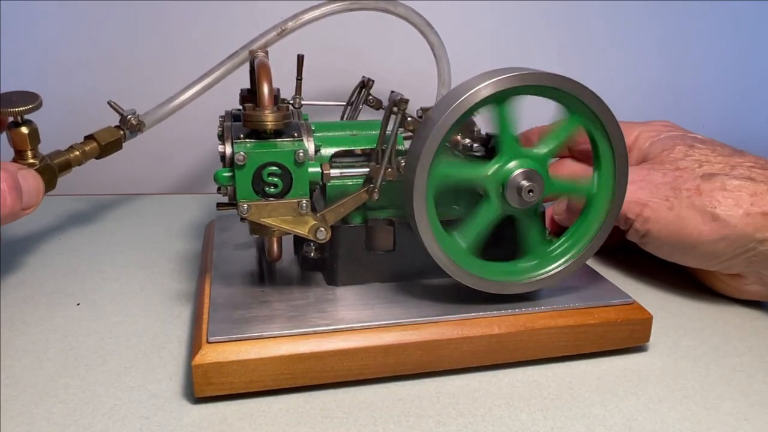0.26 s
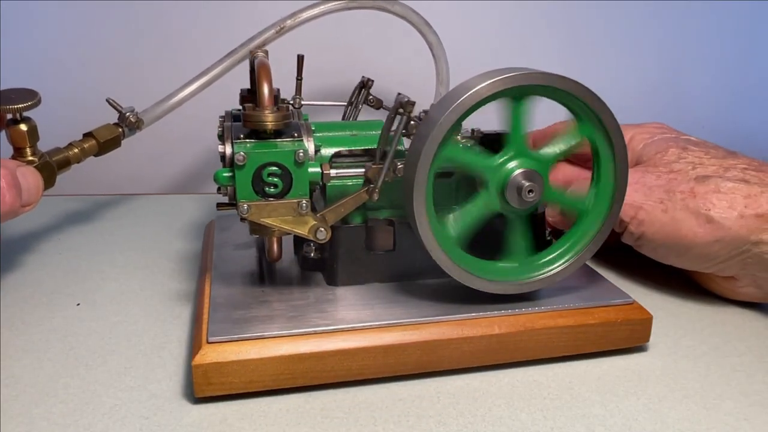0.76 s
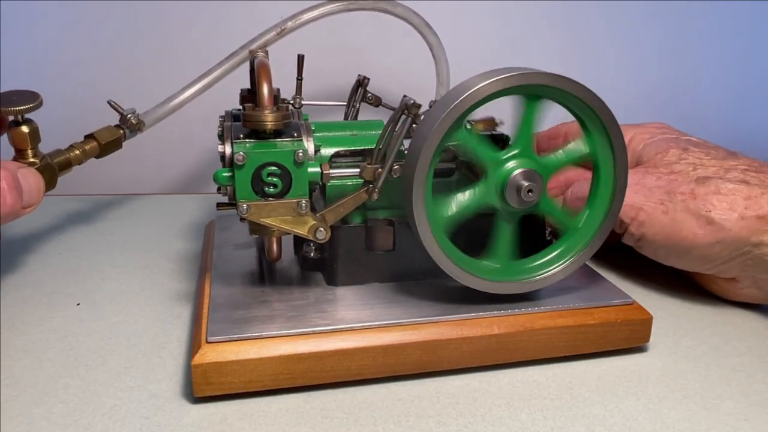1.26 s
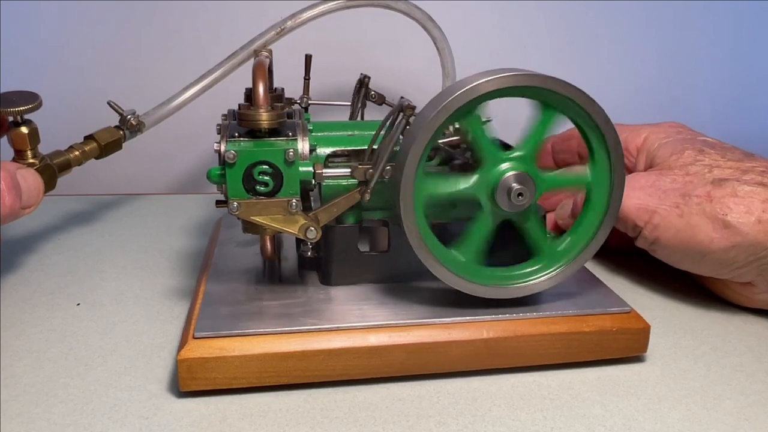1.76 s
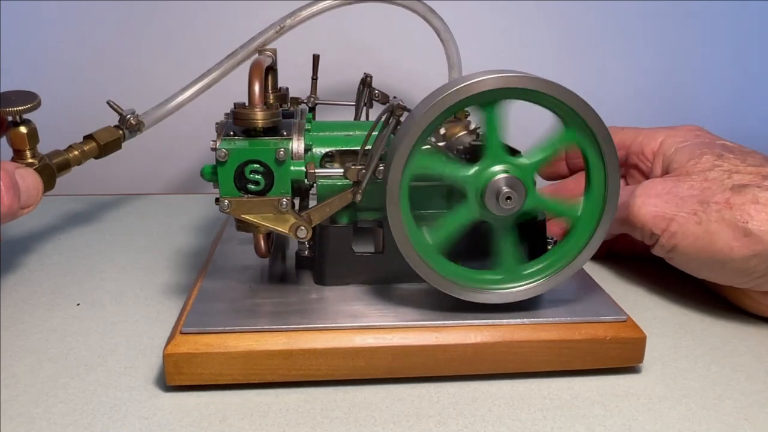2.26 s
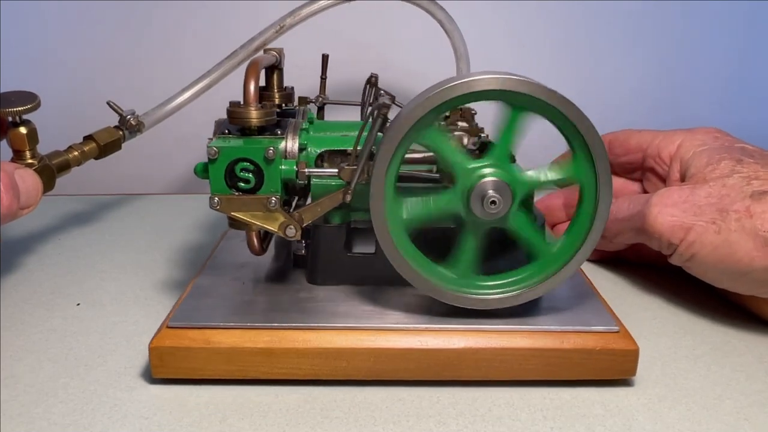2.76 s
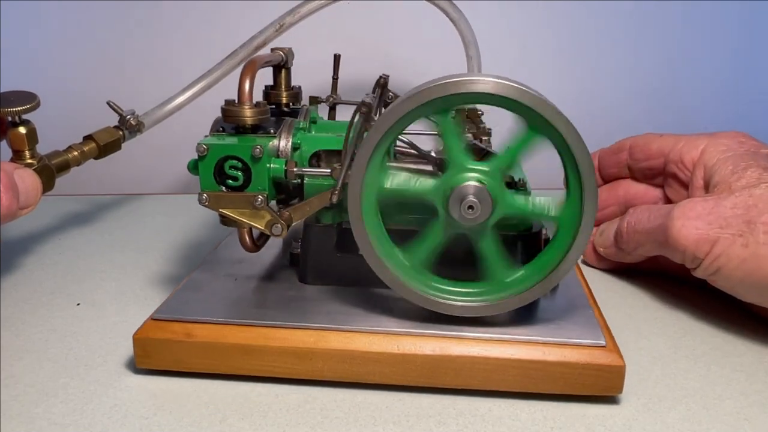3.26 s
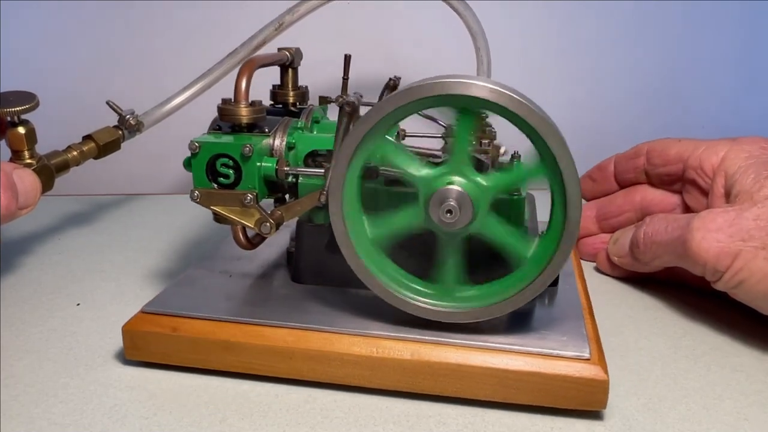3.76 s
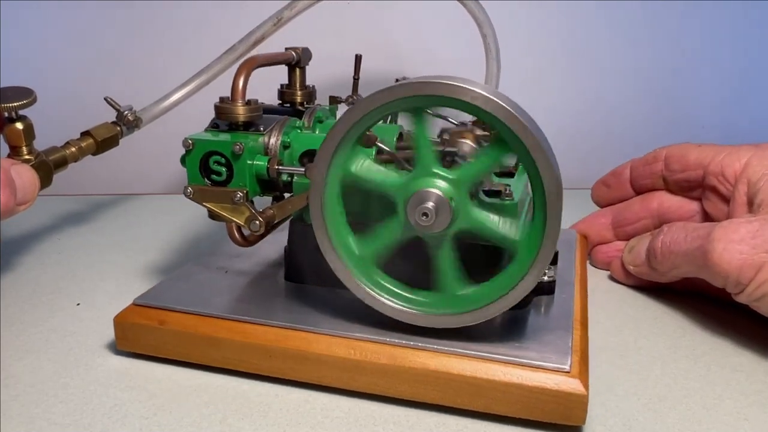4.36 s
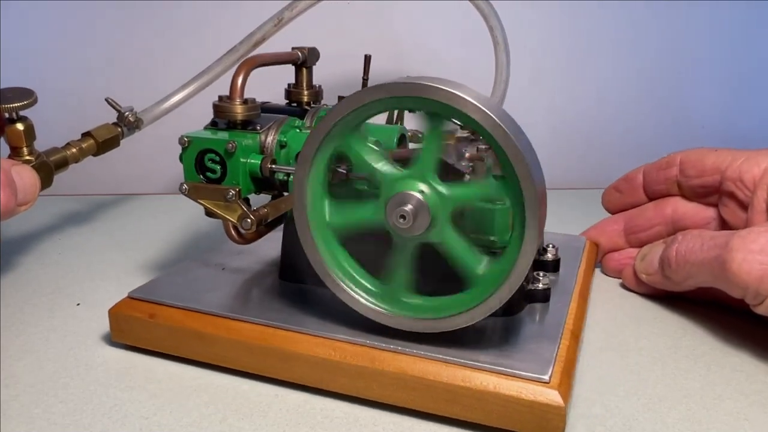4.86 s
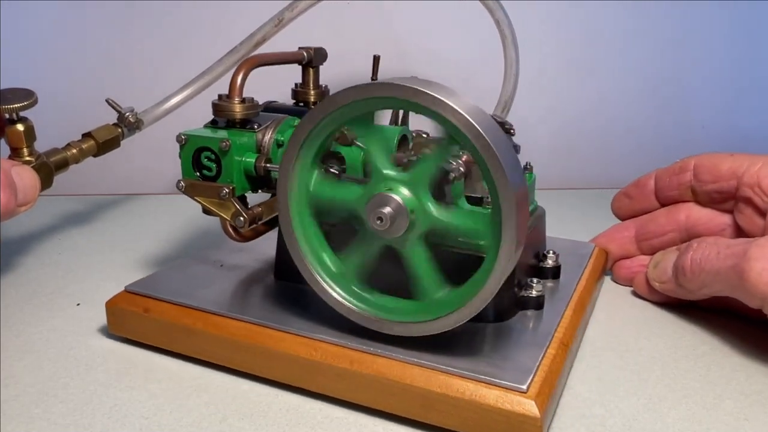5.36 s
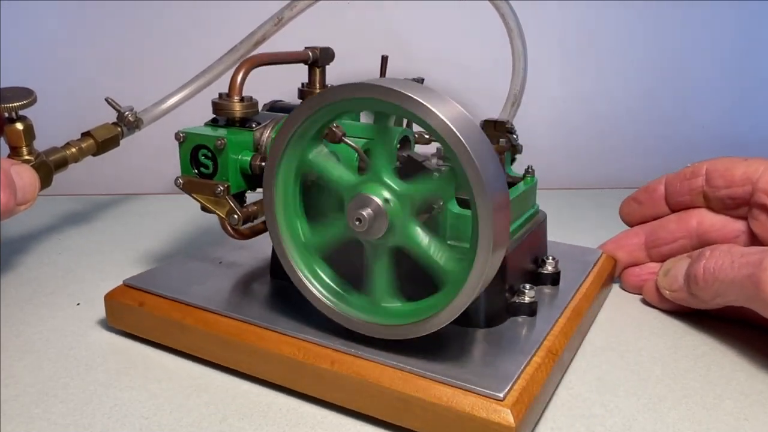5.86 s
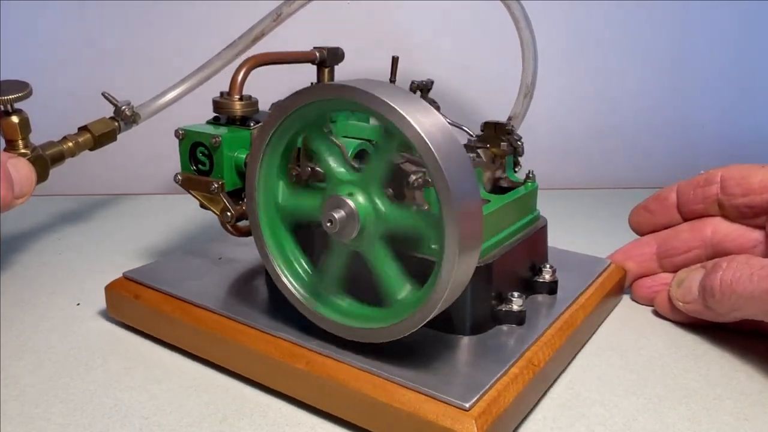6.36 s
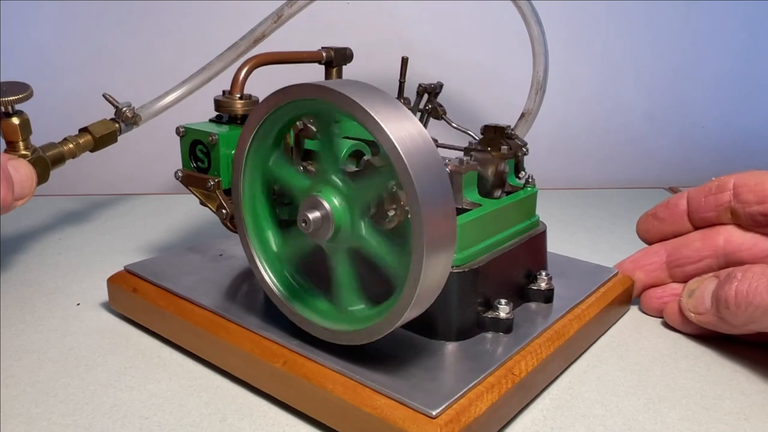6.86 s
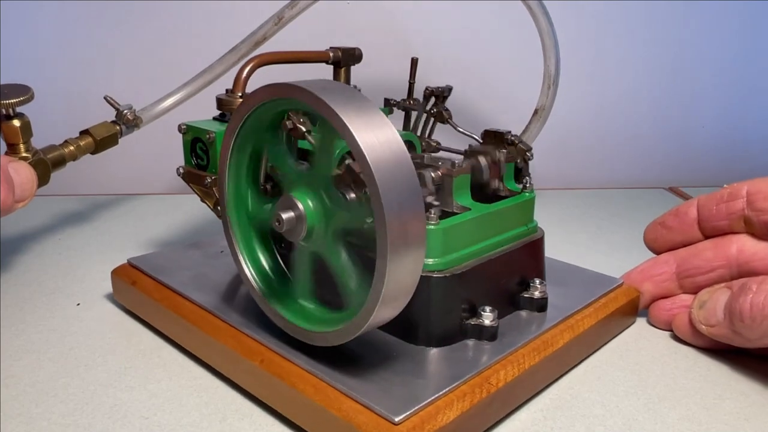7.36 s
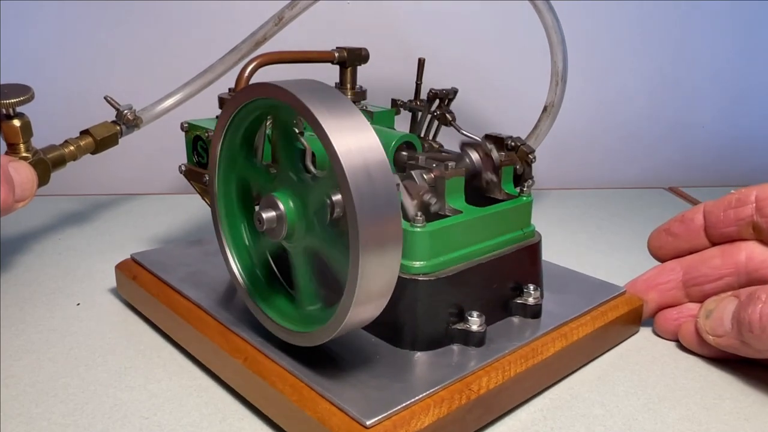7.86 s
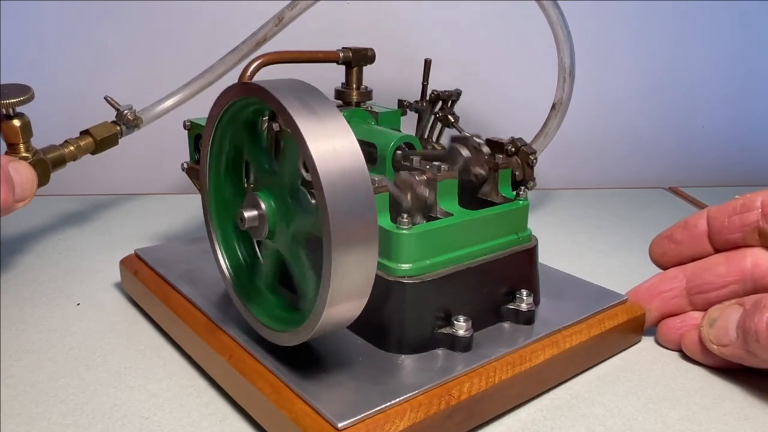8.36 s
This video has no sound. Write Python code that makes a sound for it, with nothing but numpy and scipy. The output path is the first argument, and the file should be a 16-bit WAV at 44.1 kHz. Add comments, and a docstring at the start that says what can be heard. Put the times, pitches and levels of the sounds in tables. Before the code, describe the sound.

A small compressed-air model engine runs steadily with quick, even metallic knocking, pulsing exhaust puffs and a constant hiss of air.

```python
"""On a table in a quiet room, a small compressed-air model engine runs and is slowly turned round.
Each crank turn knocks the rods at both dead centres, ringing the frame, and flicks the valve gear.
The exhaust puffs, air whistles through the cylinder ports and a high fizz pulses, all with the crank.
The supply valve leaks steadily, and the wooden base thumps the table over a low hum and rumble."""
import sys
import numpy as np
from scipy import signal
from scipy.fft import rfft, irfft, next_fast_len
from scipy.io import wavfile
from scipy.ndimage import uniform_filter1d, map_coordinates

SR = 44100
rng = np.random.default_rng(int(sys.argv[2]) if len(sys.argv) > 2 else 0)


def to_wav(sig):
    """Store sig (one row per channel, or 1-D mono) as 16-bit WAV at the path in sys.argv[1].

    Samples outside -1..1 are clipped; the rate is SR.
    """
    pcm = np.clip(np.atleast_2d(sig), -1, 1) * 32767
    pcm = np.round(pcm).astype(np.int16)
    wavfile.write(sys.argv[1], SR, pcm.T)  # frames by channels


N = 380141


def amp(db):
    """Gain of a level in dB."""
    return 10 ** (np.asarray(db) / 20)


def unit(x):
    """Scaled to rms 1."""
    return x / np.sqrt(np.mean(x ** 2) + 1e-20)


def along(points, hz):
    """(freq_hz, value) rows interpolated on a log axis."""
    freq_hz, value = np.transpose(points)
    return np.interp(np.log(hz + 1), np.log(freq_hz + 1), value)


def by_time(rows):
    """Gain per sample from (time_s, level_db) rows."""
    return amp(np.interp(np.arange(N) / SR, *np.transpose(rows)))


def drift(front_db, turned_db):
    """Gain per sample, moving evenly in dB as the base is turned."""
    return amp(np.linspace(front_db, turned_db, N))


def wobble(rate_hz):
    """Smooth random curve, rate_hz knots a second."""
    knots = rng.standard_normal(int(N * rate_hz / SR) + 4)
    return map_coordinates(knots, [np.arange(N) * rate_hz / SR])


def filtered(x, response):
    """x through a complex frequency response."""
    size = next_fast_len(N + 8192)
    return irfft(rfft(x, size) * response(np.fft.rfftfreq(size, 1 / SR)), size)[..., :N]


def peaks(modes):
    """Steep-sided response of a set of resonances."""
    return lambda hz: np.sqrt(sum((amp(db) / (1 + (2 * (hz - centre_hz) / width_hz) ** 2)) ** 2
                                  for centre_hz, width_hz, db in modes))


# Phase between channels: freq_hz, left_lead_rad
STEREO_PHASE = [(0, 0), (300, 0), (800, 1.6), (1200, .2), (2240, .2), (3450, 1.9), (3960, .8), (5500, -1),
                (7000, -3.3), (8000, -3.8), (9000, -4.6), (10300, -6.2), (11700, -6.3), (13000, -7.6),
                (14000, -9.3), (15000, -9.5), (15800, -10.6)]
# Likeness of channels: freq_hz, coherence_ratio
COHERENCE = [(40, .975), (130, .975), (220, .94), (300, .6), (800, .85), (2500, .6), (5000, .6),
             (7300, .95), (11000, .92), (15000, .7)]

def stereo(same, other, pan_db, aside=True):
    """Partly coherent pair, phase-shifted for sound from aside; positive pan_db is left."""
    def mix_rad(hz):
        return np.arccos(np.clip(along(COHERENCE, hz), 0, 1)) / 2

    def shift(hz):
        lead_rad = aside * np.interp(hz, *np.transpose(STEREO_PHASE))
        return np.exp(.5j * np.outer([1, -1], lead_rad))
    shared = filtered(same, lambda hz: np.cos(mix_rad(hz)) * shift(hz))
    apart = filtered(other, lambda hz: np.sin(mix_rad(hz)) * shift(hz) * [[1j], [-1j]])
    return (shared + apart) * amp([[pan_db / 2], [-pan_db / 2]])


def air(colour, pan_db, patchy_db, aside=True):
    """Coloured stereo noise, rms 1, with random gain patches in time and frequency."""
    spectra = signal.stft(rng.standard_normal((2, N)), nperseg=256)[2]
    patches = uniform_filter1d(rng.standard_normal(spectra.shape[1:]), size=3, axis=0)
    patches = uniform_filter1d(patches, size=6, axis=1)
    pair = signal.istft(spectra * amp(patchy_db * unit(patches)), nperseg=256)[1][:, :N]
    return unit(stereo(*filtered(pair, colour), pan_db, aside))


def ringing(hz, t60_s, rise_cycles):
    """One decaying sine per mode, with a soft onset."""
    t = np.arange(SR // 6) / SR
    hz, t60_s = np.reshape(hz, (-1, 1)), np.reshape(t60_s, (-1, 1))
    return amp(-60 * t / t60_s) * np.sin(2 * np.pi * hz * t) * (1 - np.exp(-t * hz / rise_cycles))


# Crank speed: time_s, speed_rpm
CRANK_SPEED = [(0, 254.46), (1.7, 254.52), (2.6, 252.08), (3.8, 251.92), (4.9, 253.03), (6.2, 251.43),
               (7.5, 251.25), (7.65, 246.11), (8.62, 250.04)]

def crank_starts(start_turns=.1127):
    """Times in s at which the crank passes the outer dead centre."""
    t = np.arange(-SR // 4, N + SR // 2) / SR
    turns = np.cumsum(np.interp(t, *np.transpose(CRANK_SPEED))) / (60 * SR)
    turns = turns - np.interp(0, t, turns) + start_turns
    count = int(np.interp(N / SR, t, turns)) + 2
    return np.interp(np.arange(count), turns, t)


def by_crank(rows):
    """Gain per sample from (angle_turns, level_db) rows, repeated every turn."""
    starts_s = crank_starts()
    angle_turns = np.interp(np.arange(N) / SR, starts_s, np.arange(len(starts_s))) % 1
    return amp(np.interp(angle_turns, *np.transpose(rows)))


def struck(angle_turns, db, sound, jitter_s):
    """Plays the pair sound(turned) once a crank turn; turned runs 0-1 as the base goes round."""
    out, starts_s = np.zeros((2, N + 2 * SR)), crank_starts()
    for start_s, end_s in zip(starts_s, starts_s[1:]):
        hit_s = start_s + angle_turns * (end_s - start_s) + jitter_s * rng.standard_normal()
        at = SR // 2 + round(hit_s * SR)
        blow = amp(db) * sound(start_s * SR / N)
        out[:, at:at + blow.shape[1]] += blow
    return out[:, SR // 2:][:, :N]


# Room decay: freq_hz, t60_s
ROOM_DECAY = [(150, 0.25), (1000, 0.17), (8000, 0.057)]

def reverb(x):
    """Short room tail; the treble dies first."""
    hz, t, spectra = signal.stft(rng.standard_normal((2, SR // 2)), SR, nperseg=256)
    decay = amp(-60 * t / along(ROOM_DECAY, hz)[:, None])
    tail = signal.istft(spectra * decay, SR, nperseg=256)[1]
    delayed = np.pad(x, (200, 0))[None]
    return signal.fftconvolve(delayed, tail / np.linalg.norm(tail[0]), axes=1)[:, :N]


# Rumble spectrum: freq_hz, density_db
RUMBLE_SPECTRUM = [(20, -46), (35, -19), (50, -3), (65, -5.5), (90, -8.5), (125, -8), (230, -25.5),
                   (262, -10.5), (290, -27.5), (420, -27), (700, -120)]

def rumble():
    """Steady low noise of the room."""
    return amp(-51.5) * air(lambda hz: amp(along(RUMBLE_SPECTRUM, hz)), pan_db=.6, patchy_db=1.1)


# Hum swells: time_s, level_db
HUM_SWELLS = [(0, -61), (2, -57), (3.6, -47), (4.7, -57.5), (5.4, -47), (6.1, -52.5), (6.9, -50),
              (7.7, -53), (8.62, -68)]

def hum(pitch_hz=75, waver_hz=3.5):
    """Low hum, wavering in pitch and strength."""
    hz = pitch_hz + waver_hz * np.array([wobble(14), wobble(14)])
    phase = 2 * np.pi * np.cumsum(hz, axis=1) / SR
    tone = amp(2.5 * wobble(10)) * np.sin(phase)
    return by_time(HUM_SWELLS) * unit(stereo(*tone, pan_db=.6))


# Hiss spectrum: freq_hz, density_db
HISS_SPECTRUM = [(200, -1.5), (300, -2), (600, -4), (1000, -7), (1500, -4), (2000, -10), (2600, -6),
                 (3050, -9), (3900, -6.5), (5500, -8.5), (8500, -12), (9800, -44), (12000, -10.5),
                 (14000, -3.5), (15000, -13.5), (15800, -6.5)]

def broad_hiss(low_cut_hz=150):
    """Wideband hiss of leak and room."""
    hiss = air(lambda hz: amp(along(HISS_SPECTRUM, hz)) * (hz > low_cut_hz), pan_db=.4, patchy_db=3.5)
    return amp(-44) * hiss


# Leak resonances: centre_hz, width_hz, level_db
LEAK_BANDS = [(6800, 1220, -2), (7170, 510, 4.5), (7670, 440, 0.5), (8230, 500, -5), (9070, 1220, -6.5)]

def leak():
    """Air escapes steadily at the supply valve."""
    return drift(-42.5, -42) * air(peaks(LEAK_BANDS), pan_db=0, patchy_db=2.5)


# Table top modes: pitch_hz, level_db, t60_s
TABLE_MODES = [(109, -7, 0.11), (127.5, -2, 0.14), (153.5, 4.5, 0.1), (176.4, 7, 0.078), (190.6, -5, 0.082),
               (226.4, -0.5, 0.088), (249.6, -11, 0.18)]

def table_top(blows, tilt_db_per_oct, settle_s=2.2):
    """Blows of the base ring the table, rms 1; sharper blows tilt toward the high modes."""
    hz, mode_db, t60_s = np.transpose(TABLE_MODES)
    ring = ringing(hz, t60_s, rise_cycles=1.2) * amp(tilt_db_per_oct * np.log2(hz / hz[0]))[:, None]
    out = 0
    for angle_turns, first_db, settled_db in blows:
        def thump(turned):
            change_db = (settled_db - first_db) * np.clip(turned * N / SR / settle_s, 0, 1)
            scatter_db = rng.normal(0, .8, (2, len(hz)))
            return amp(change_db + mode_db + scatter_db) @ ring
        out = out + struck(angle_turns, first_db, thump, jitter_s=.001)
    return unit(stereo(*out, pan_db=.5))


# Rocking pushes: angle_turns, first_db, settled_db
BASE_PUSHES = [(.135, 9, 5), (.21, 5, -1.5), (.435, -4, 5), (.58, -1, -8.5), (.795, -35, -0.5)]

def rocking():
    """The base rocks against the table with dull thumps."""
    return drift(-50.5, -52) * table_top(BASE_PUSHES, tilt_db_per_oct=-10.5)


# Rod reversals: angle_turns, first_db, settled_db
ROD_JOLTS = [(.03, -3, 4.5), (.515, 1.5, 3.5)]
# Fade of the jolts: time_s, level_db
JOLT_FADE = [(0, -43.5), (1, -46), (2, -56), (3, -59), (8.62, -62)]
# Low-mid rustle: centre_hz, width_hz, level_db
RUSTLE_BAND = [(417, 1500, 0)]

def jolts():
    """The reversing rod jolts the table; jolts and a rustle fade as the base is turned."""
    thumps = table_top(ROD_JOLTS, tilt_db_per_oct=13)
    rustle = amp(-8.5) * air(peaks(RUSTLE_BAND), pan_db=-1, patchy_db=1)
    return by_time(JOLT_FADE) * (thumps + rustle)


# Fizz bands: centre_hz, width_hz, level_db
FIZZ_BANDS = [(13150, 540, -1), (14600, 1300, -8), (15300, 600, -3)]
# Level of the top-treble fizz: time_s, level_db
FIZZ_ENVELOPE = [(0, -72), (1.4, -68), (2.2, -52), (3.4, -51), (4.8, -52), (5.4, -60), (6.6, -69),
                 (8.62, -69)]

def treble_fizz():
    """A top-treble fizz rises, holds, then falls, pulsing once a turn."""
    fizz = air(peaks(FIZZ_BANDS), pan_db=-2, patchy_db=2.5, aside=False)
    return by_crank(PORT_FLOW) * by_time(FIZZ_ENVELOPE) * fizz


# Port flow over one turn: angle_turns, level_db
PORT_FLOW = [(0, -24), (.06, 7.5), (.12, -4), (.3, -0.5), (.36, -3.5), (.42, 3), (.6, 0.5), (.75, -1.5),
             (.88, -5), (.96, 0.5), (1, -1.5)]
# Air resonances: centre_hz, width_hz, level_db
PASSAGE_BANDS = [(832, 94, 1), (1480, 160, -8), (2535, 720, -9.5), (3484, 324, 1.5), (4590, 830, -5.5),
                 (5040, 120, -2)]
PIPE_BAND = [(6127, 630, 0)]
THROAT_BAND = [(4325, 170, 0)]
# Pipe and throat swells: time_s, level_db
PIPE_SWELLS = [(0, -50.5), (1.8, -53.5), (3, -47.5), (4.2, -54.5), (6, -48), (7, -52), (8.62, -47.5)]
THROAT_SWELLS = [(0, -51), (2.5, -51.5), (4.5, -51), (6.5, -54), (8.62, -50.5)]

def cylinder_ports():
    """Air pulses through the ports: breathy whistles to the left."""
    passages = drift(-47, -46.5) * air(peaks(PASSAGE_BANDS), pan_db=7.5, patchy_db=1.5)
    pipe = by_time(PIPE_SWELLS) * air(peaks(PIPE_BAND), pan_db=7.5, patchy_db=3)
    throat = by_time(THROAT_SWELLS) * air(peaks(THROAT_BAND), pan_db=12.5, patchy_db=0)
    return by_crank(PORT_FLOW) * (passages + pipe + throat)


# Exhaust opening over one turn: angle_turns, level_db
EXHAUST_OPENING = [(0, -2), (.05, -2.5), (.1, -9), (.18, -4.5), (.3, -0.5), (.35, -6.5), (.41, -9),
                   (.45, -10.5), (.49, 1.5), (.6, -6), (.7, -6), (.88, -7.5), (.95, -9), (1, -1)]
# Jet and edge tone resonances: centre_hz, width_hz, level_db
JET_BANDS = [(10580, 600, 11), (11700, 270, -8), (12160, 340, 6)]
EDGE_BAND = [(11220, 870, 0)]
# Edge tone swells: time_s, above_jet_db
EDGE_SWELLS = [(0, -3.5), (1.5, 0.5), (2.3, 6.5), (3.2, 1), (4, -2.5), (5, -4), (6.5, -0.5), (8.62, 1.5)]

def exhaust(flicker_db=.45):
    """A hissing jet and its edge tone puff as the exhaust opens."""
    edge = by_time(EDGE_SWELLS) * air(peaks(EDGE_BAND), pan_db=0, patchy_db=2)
    gain = by_crank(EXHAUST_OPENING) * drift(-43.5, -47) * amp(flicker_db * wobble(40))
    jet = air(peaks(JET_BANDS), pan_db=0, patchy_db=2)
    return gain * (jet + edge)


# Valve gear ticks: angle_turns, level_db
VALVE_TICKS = [(0.057, -35.5), (.41, -41), (.478, -49)]

def valve_gear(pitch_hz=13050, scatter_db=3):
    """A tiny steel link ticks, unevenly from turn to turn."""
    ring = ringing(pitch_hz, t60_s=.016, rise_cycles=.73)

    def tick(_):
        return amp(rng.normal(0, scatter_db)) * ring * [[1], [1]]
    return sum(struck(angle_turns, db, tick, jitter_s=.0008) for angle_turns, db in VALVE_TICKS)


# Frame and bed plate modes: pitch_hz, front_db, turned_db, t60_s
FRAME_MODES = [(445, -16, -9.5, 0.023), (573, -25, -6.5, 0.028), (728, -7, -3.5, 0.035),
               (807.8, 3.5, 1, 0.041), (835.3, 3, 0, 0.053), (1003, -26, -7, 0.049),
               (1146, -7.5, -9, 0.037), (1405, -1.5, -13.5, 0.024), (1980, 0.5, -15, 0.018),
               (2152, -10, -3.5, 0.026), (2532, -20.5, -11, 0.065), (3524, -54, -1, 0.06),
               (4480, -20, -4, 0.04), (4600, -10.5, -18, 0.13), (5740, -25, -1, 0.04),
               (6780, -5.5, 14, 0.011)]
# Rod contacts (knock, rebound, slack take-up, inner knock, light tap):
# angle_turns, front_db, turned_db, cutoff_hz, scrape_db
ROD_CONTACTS = [(0, -26, -27.5, 4600, 6.5), (.064, -39, -35.5, 2040, 18.5), (.426, -27, -24.5, 950, -21.5),
                (.491, -29, -29.5, 2820, 5.5), (.865, -41.5, -44, 3000, -4)]

def rod_knocks(scrape_rise_s=.0017, scrape_t60_s=.027):
    """Rods knock, scrape and ring the frame; a soft, long contact spares the high modes."""
    hz, mode_front_db, mode_turned_db, t60_s = np.transpose(FRAME_MODES)
    ring = ringing(hz, t60_s, rise_cycles=1.37)
    t = np.arange(ring.shape[1]) / SR
    alternating = (-1.) ** np.arange(len(hz))  # neighbouring modes move against each other
    out = 0
    for angle_turns, front_db, turned_db, cutoff_hz, scrape_db in ROD_CONTACTS:
        scrape_band = signal.butter(2, [750, cutoff_hz], "band", fs=SR)

        def knock(turned):
            signs = np.array([alternating, rng.choice([-1, 1], len(hz))])
            scatter_db = rng.normal(0, .8, signs.shape)
            mode_db = mode_front_db + turned * (mode_turned_db - mode_front_db) + scatter_db
            weights = signs * amp(mode_db) / (1 + (hz / cutoff_hz) ** 2)
            scrape = signal.lfilter(*scrape_band, rng.standard_normal((2, len(t))))
            scrape *= amp(scrape_db - 60 * t / scrape_t60_s) * (1 - np.exp(-t / scrape_rise_s))
            gain = amp(turned * (turned_db - front_db) + rng.normal(0, .5))
            return gain * (weights @ ring + scrape)
        out = out + struck(angle_turns, front_db, knock, jitter_s=.0003)
    return out


def scene():
    """Metal with its reverb, table thumps, hisses and background."""
    metal = rod_knocks() + valve_gear()
    clatter = stereo(*metal, pan_db=1) + amp(-11) * reverb(metal[0])
    thumps = rocking() + jolts()
    hisses = exhaust() + treble_fizz() + cylinder_ports() + leak()
    background = broad_hiss() + rumble() + hum()
    return background + thumps + hisses + clatter


def record(dry):
    """Brick-wall low-pass."""
    top_hz = 15780
    return filtered(dry, lambda hz: hz < top_hz)


dry = scene()
out = record(dry)
to_wav(out)
```